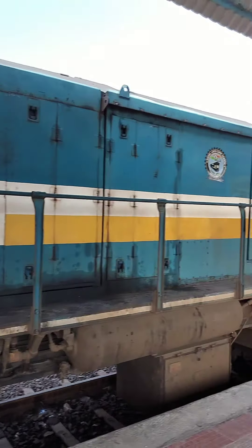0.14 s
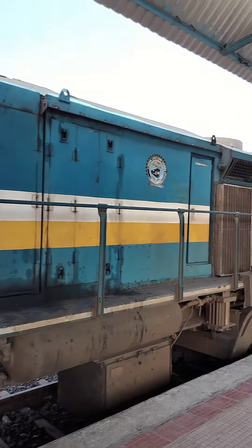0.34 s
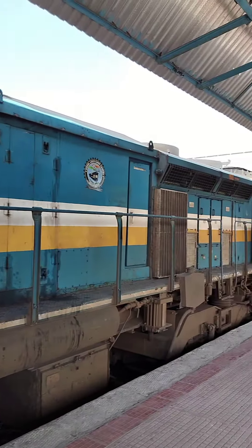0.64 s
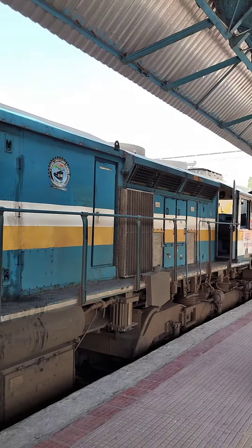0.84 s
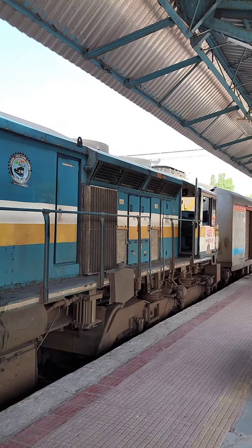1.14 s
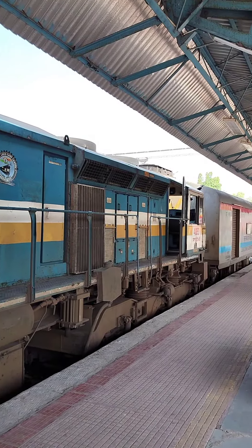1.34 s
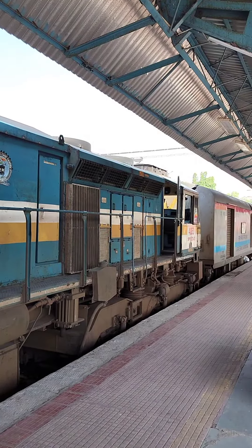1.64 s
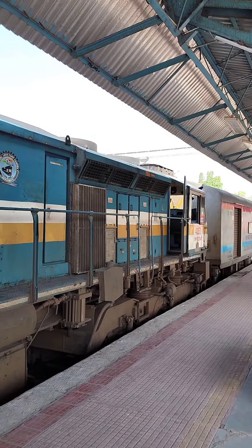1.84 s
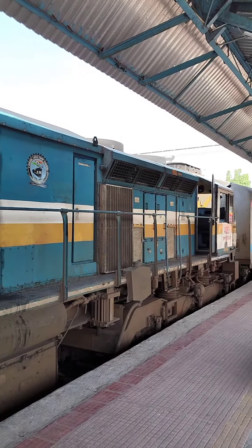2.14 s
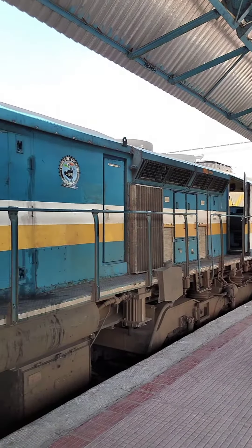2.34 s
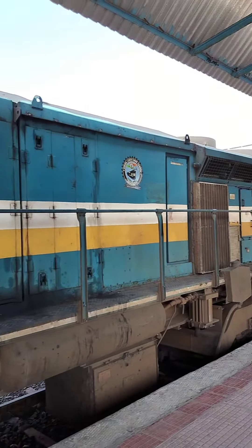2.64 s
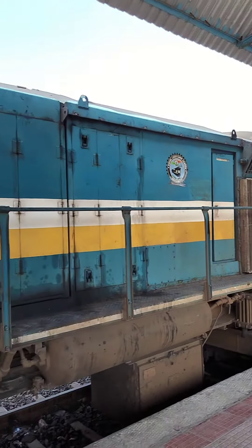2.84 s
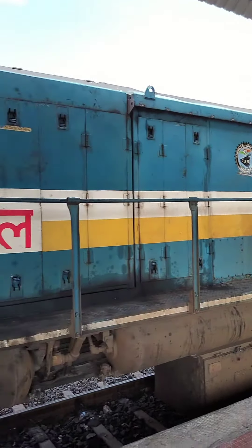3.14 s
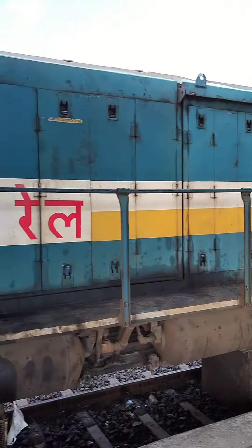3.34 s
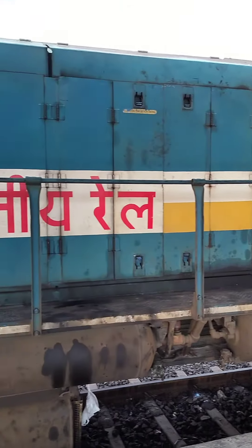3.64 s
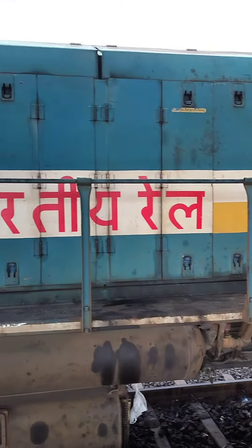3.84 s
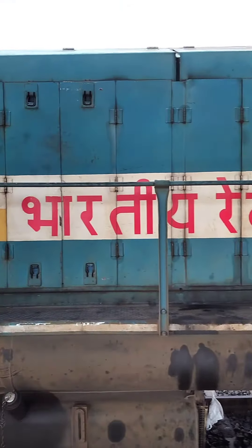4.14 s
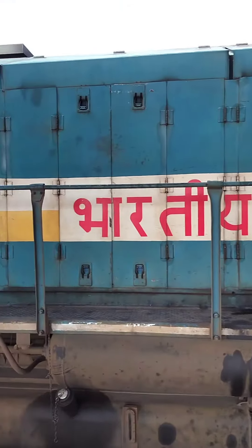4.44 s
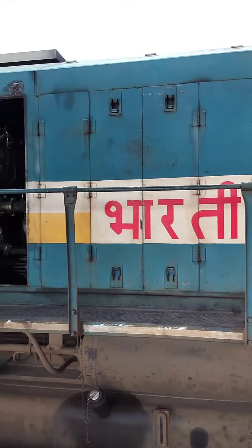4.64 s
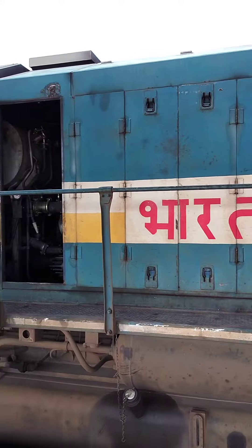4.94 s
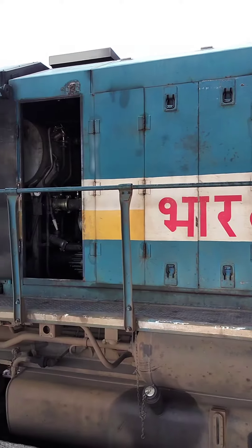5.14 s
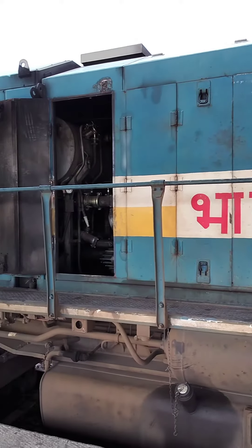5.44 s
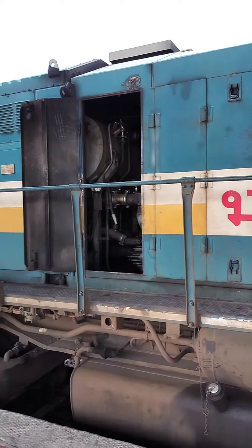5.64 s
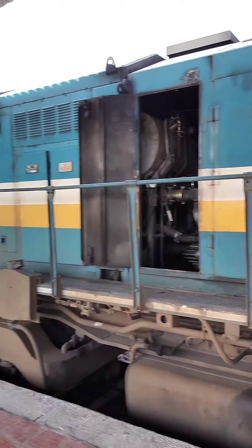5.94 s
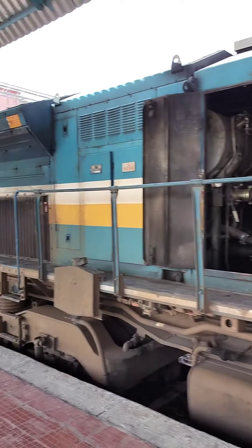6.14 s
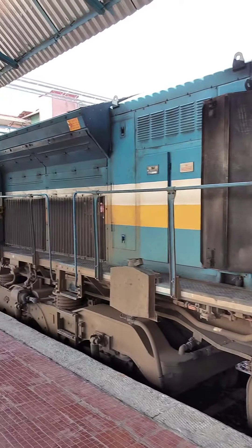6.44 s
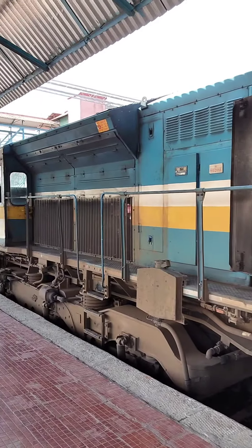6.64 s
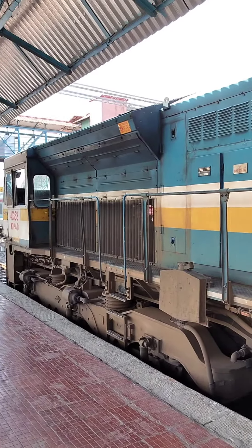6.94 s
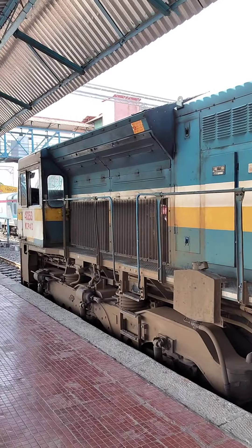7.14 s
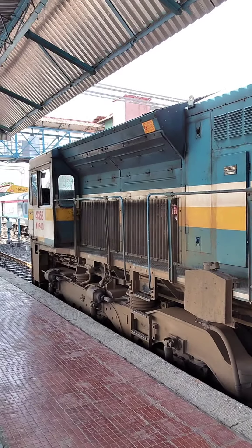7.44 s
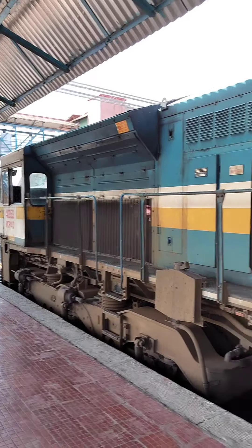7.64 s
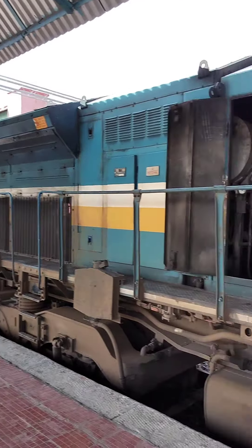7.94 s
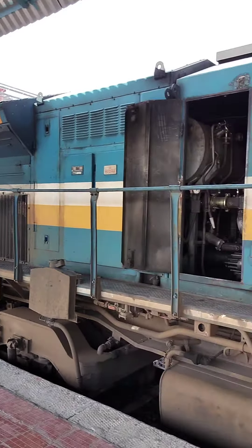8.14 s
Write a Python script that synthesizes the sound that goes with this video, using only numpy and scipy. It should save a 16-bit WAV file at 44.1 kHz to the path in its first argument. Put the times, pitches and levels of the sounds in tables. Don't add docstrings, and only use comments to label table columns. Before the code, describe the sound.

A big diesel locomotive stands at a roofed platform, its engine running at unchanging speed. A deep hum of about 76 hertz throbs with a slight hitch each shaft turn, under broad fan roar, rattling valves and panels, midrange gear whine and piercing turbocharger whistles. A handheld stereo phone, close by, pans right, then sweeps left; whines swell, fade and shift between ears, while clatter grows knockier near an open engine door.

```python
import sys
import numpy as np
from scipy import signal
from scipy.fft import rfft, irfft, next_fast_len
from scipy.io import wavfile
from scipy.ndimage import uniform_filter1d

SR = 44100
rng = np.random.default_rng(int(sys.argv[2]) if len(sys.argv) > 2 else 0)


def boost_factor(decibels):
    exponent = np.asarray(decibels, float) / 20
    return 10 ** exponent


def log_audio(samples):
    frames = np.atleast_2d(samples).T
    limited = np.clip(frames, -1, 1)
    pcm = np.round(limited * 32767).astype(np.int16)
    wavfile.write(sys.argv[1], SR, pcm)


N = 365148
T = np.arange(N) / SR
SHAFT_HZ, SHAFT_START_TURNS = 9.48979, -.0295
TURNS = SHAFT_HZ * T + SHAFT_START_TURNS

# (time [s], level [dB], left minus right [dB])
HUM_LEVEL = [(0.0, -17.5, -0.5), (1.71, -17, -1), (4.8, -16.5, -0.5), (6.59, -16, -1.5), (8.28, -15, -1)]
# (time [s], heading [deg], left positive)
PHONE_HEADING = [(0, -20.5), (.25, -32), (.5, -44), (1, -59.5), (1.5, -61), (2.25, -58.5), (3, -36.5),
                 (4, -0.5), (4.75, 15), (5.75, 32), (6.5, 64), (7.25, 66), (7.5, 67), (8.28, 50)]


def curves(table):
    times, *columns = np.transpose(table)
    return [np.interp(T, times, column) for column in columns]


def facing(table):
    degrees, *columns = np.transpose(table)
    heading, = curves(PHONE_HEADING)
    return [np.interp(heading, degrees, column) for column in columns]


def over(hz, table):
    points, values = np.transpose(table)
    return np.interp(np.log(hz + 1), np.log(points), values)


def unit(x):
    return x / np.sqrt(np.mean(x ** 2))


def placed(db, pan_db):
    return boost_factor(db + np.array([pan_db, -pan_db]) / 2)


def walk(rate):
    k = int(SR / rate)
    steps = np.repeat(rng.standard_normal(N // k + 1), k)
    return 1.24 * uniform_filter1d(uniform_filter1d(steps, k), k)[:N]


def swells(table, between_db):
    gain = boost_factor(between_db)
    for time, length, peak_db, *_ in table:
        phase = np.pi * np.clip((T - time) / length, -.5, .5)
        gain = gain + boost_factor(peak_db) * np.cos(phase) ** 2
    return 20 * np.log10(gain)


def colour(shared, left, right, spectrum):
    # (frequency [Hz], shared part of the power [0-1])
    likeness = [(60, 0.7), (130, 0.99), (290, 0.75), (640, 0.49), (1400, 0.12), (3000, 0.17), (15000, 0.1)]
    # (frequency [Hz], left minus right [dB])
    port_tilt = [(60, 4.5), (700, -2), (1300, 0.5), (2400, -1), (4400, 3.5), (5600, -2.5), (8100, 4.5),
                 (9300, -1.5), (15000, -5)]
    lag_samples = -22
    size = next_fast_len(N)
    hz = np.arange(size // 2 + 1) * SR / size
    like = np.clip(over(hz, likeness), 0, 1)
    late = np.exp(-2j * np.pi * hz * lag_samples / SR * np.clip(hz / 900 - .3, 0, 1))
    s, l, r = (rfft(noise, size) for noise in (shared, left, right))
    pair = np.sqrt(like) * np.array([s * late, s]) + np.sqrt(1 - like) * np.array([l, r])
    gains = placed(over(hz, spectrum), over(hz, port_tilt))
    return irfft(pair * gains, size)[:, :N]


def every_turn(memory, gate):
    turn = int(round(SR / SHAFT_HZ))
    fresh = rng.standard_normal((N // turn + 41, turn))
    repeated = signal.lfilter([1], [1, -min(memory, .99)], fresh, axis=0)
    return repeated[40:].ravel()[:N] * gate


def tone(cycles, left_db, right_db, lead=0, flutter_db=0.5, rate=6):
    start = 2 * np.pi * (cycles + rng.random())
    left = boost_factor(left_db + flutter_db * walk(rate)) * np.cos(start + lead / 2)
    right = boost_factor(right_db + flutter_db * walk(rate)) * np.cos(start - lead / 2)
    return np.sqrt(2) * np.array([left, right])


def fans():
    # (frequency [Hz], level per Hz [dB])
    roar = [(20, -14), (45, 4.5), (90, 10), (220, 3.5), (500, 2), (750, 4), (1500, 1.5), (2500, 2.5),
            (3300, -0.5), (4600, -2), (7500, -10.5), (9400, -38), (10000, -27), (15600, -25)]
    air = colour(*rng.standard_normal((3, N)), roar)
    level_db = -26 + 0.3229 * T + 0.64 * walk(2.55)
    return unit(air) * placed(level_db, np.full(N, -1.56))


def spit():
    # (time [s], peak [dB], decay [s])
    releases = [
        (4.66, -51, .05),
    ]
    band = signal.butter(2, [10500, 14500], "band", fs=SR, output="sos")
    out = 0
    for time, peak_db, decay in releases:
        since = np.maximum(T - time, 0)
        shape = (1 - np.exp(-since / .01)) * np.exp(-since / decay)
        hiss = signal.sosfilt(band, rng.standard_normal((2, N)))
        out = out + boost_factor(peak_db) * shape * unit(hiss)
    return out


def intake():
    # (time [s], length [s], peak [dB])
    surges = [(0, 0.14, -33), (.3, 0.22, -42), (.8, .25, -43), (1.3, .3, -31.5), (1.85, 0.18, -46),
              (2.3, 0.64, -40), (2.75, 0.23, -39), (3.3, 0.66, -44), (4.0, 0.33, -51), (4.62, .3, -50),
              (4.98, 0.29, -36), (5.2, .2, -45), (5.82, 0.4, -41), (6.52, 0.56, -37), (7.3, 0.42, -34),
              (7.85, 0.24, -54), (8.28, 0.33, -49)]
    level_db = swells(surges, -39)
    cycles = 8399 * T + np.cumsum(4.0 * walk(25)) / SR
    beat = 1 + 0.33 * np.cos(2 * np.pi * 8 * TURNS)
    whistle = beat * tone(cycles, level_db, level_db - 19.0, 3 * walk(2.06), flutter_db=2.5, rate=27)
    breath = signal.lfilter(*signal.iirpeak(8400, 38, SR), rng.standard_normal((2, N)))
    breath_db = -44.0 + 0.09 * (level_db + 43.5)
    return whistle + unit(breath) * placed(breath_db, np.full(N, 13.2))


def turbo():
    # (time [s], length [s], peak [dB])
    left_swells = [(.1, 0.6, -33.5), (.47, 0.48, -34), (1.5, 1.65, -32), (2.5, 0.44, -44),
                   (3.0, 0.68, -33.5), (3.68, .45, -32.5), (4.85, 1.2, -30.5), (5.4, 0.42, -37),
                   (5.9, 0.93, -35), (6.65, 0.95, -39), (7.35, 2.2, -32.5), (8.2, 0.27, -48)]
    # (time [s], length [s], peak [dB], left lead [rad])
    right_swells = [(0, .4, -32, 1), (.62, 0.86, -31, 3.3), (1.8, 0.8, -38, 0.95), (2.35, 0.46, -37, 1),
                    (2.75, 0.19, -39, 0), (3.204, 0.94, -29.5, -6), (3.6, 0.53, -43, -6.5),
                    (4.148, 0.48, -31, -8.5), (4.75, 0.39, -45, -12), (5.36, 0.63, -36, -11.5),
                    (5.922, 0.57, -34, -12), (6.365, 0.51, -34.5, -12), (7.1, 0.35, -57, -15),
                    (7.927, 0.43, -28.5, -11)]
    # (time [s], length [s], peak [dB])
    low_swells = [
        (.1, .6, -49),
        (.8, 0.85, -48.5),
        (1.85, 1, -48),
        (3.2, 1, -47),
        (5.9, .6, -53),
        (6.7, 0.79, -49),
        (7.2, .6, -56),
        (8.2, .4, -53),
    ]
    # (left [dB], right [dB])
    high_levels = (-56, -57)
    waver = np.cumsum(walk(5)) / SR
    heading, = curves(PHONE_HEADING)
    side_on_db = 0.31 * np.maximum(heading - 45, 0)
    high_l, high_r = (db + 2 * walk(2.35) for db in high_levels)
    low_db = swells(low_swells, -55)
    low_l = low_db - 0.5 + side_on_db
    low_r = low_db + 0.5 - side_on_db
    blades = [swells(side, -46.5) for side in (left_swells, right_swells)]
    lead = curves(right_swells)[-1]
    out = tone(4607.5 * T + 1.5 * waver, *blades, lead, flutter_db=1.6, rate=25)
    out += tone(5389 * T + 1.8 * waver, low_l, low_r, .9 * walk(1), flutter_db=2.2, rate=6)
    out += tone(9110 * T + 3 * waver, high_l + side_on_db, high_r, .9 * walk(1), flutter_db=2.2, rate=6)
    return out + intake()


def gears():
    # (heading [deg], left [dB], right [dB], left lead [rad])
    mesh_79 = [(-58.5, -29.5, -20.5, -1.4), (-67, -25.5, -19.5, 2.5), (-45.0, -23.5, -21, 1),
               (-34, -27.2, -23.1, -0.2), (-25.5, -30, -26.5, -0.5), (-15, -27, -20.5, -4),
               (4.5, -17.5, -32.5, -6), (14.5, -17.9, -37.8, -4.5), (23.5, -20, -32.0, -3.5),
               (32, -26.5, -25, -4), (41, -35, -25.5, -3), (51, -34, -24.5, -2), (70.0, -28, -28, -0.9)]
    mesh_113 = [(-61, -36, -29.5, 0.2), (-56.5, -32, -25, -1.7), (-43, -36, -26.5, -1.2),
                (-35.0, -41, -27, -3), (-29, -47.1, -31.5, -2), (-17, -44.4, -38.8, -4.5),
                (0.0, -30, -39.2, -5.1), (9, -34.5, -45, -7), (22, -44.7, -38, -2.8), (29, -44, -33, -1),
                (46, -31, -54, 0.7), (72, -38.6, -48, 5.5), (68, -46, -44, 4.5)]
    mesh_158 = [(-61.5, -47, -30.5, 4), (-46.5, -41, -35.5, 0.5), (-31, -33, -29.5, 1.3),
                (-24, -38, -33, 1.5), (-15, -37, -40, -5), (7, -49, -38, -8), (31, -38, -33, -8),
                (46, -42, -31.5, -8.8), (70, -36, -33, -8.5)]
    mesh_72 = [(-68, -36.5, -37, -5), (-51, -55, -37, -2.5), (-44, -53, -35, -6), (-37, -36.0, -31.4, -6.5),
               (-25.0, -37, -37.5, -5.6), (-14.0, -31.5, -36, -6.5), (-1, -31, -29, -5.7),
               (7, -33, -29.5, -6.5), (25.0, -38, -32.8, -5.7), (37, -35, -29, -5), (47, -41.7, -32, -8),
               (58.0, -41.5, -30, -8.5), (70.0, -39.0, -44, -6.8)]
    mesh_237 = [(-64, -37, -48, -0.64), (-50, -48, -39, -.7), (-5, -42, -45, -0.21), (-2, -47, -44, -1.6),
                (20, -39, -45, 1), (35, -47, -36, 0.38), (50, -46, -30.5, 1), (72, -41, -41, 0)]
    # (multiple of shaft rate, left [dB], right [dB])
    lesser = [(41, -52, -43), (46, -47, -50), (48, -46, -50), (1243.6, -73, -73), (34, -43, -45),
              (1135.6, -70, -70), (1445.4, -70, -70), (226, -52, -46), (474.3, -50, -49), (564.8, -60, -59),
              (110.4, -48, -44), (30.4, -50, -43), (18.3, -43, -46), (477.5, -55, -58), (496.5, -58, -58)]
    out = tone(79 * TURNS, *facing(mesh_79)) + tone(113 * TURNS, *facing(mesh_113))
    depth = 0.36 + 0.49 * np.exp(-(T / 0.57) ** 2)
    throb = 1 + depth * np.cos(2 * np.pi * (TURNS - .07))
    out += throb * tone(158 * TURNS, *facing(mesh_158), flutter_db=1.5)
    out += tone(72 * TURNS, *facing(mesh_72), flutter_db=2.5, rate=12)
    out += tone(237 * TURNS, *facing(mesh_237), flutter_db=1.5)
    for k, left_db, right_db in lesser:
        out += tone(k * TURNS, left_db, right_db, 2.23 * walk(.6), flutter_db=3.5, rate=1.51)
    return out


def knock():
    # (heading [deg], level [dB], left minus right [dB])
    knock_levels = [
        (-64, -42, 5),
        (-20, -44, -1),
        (25, -34, -2),
        (45, -32, 0),
        (70, -31, -3),
    ]
    modes = [(672.5, 21, 0.), (729, 21, -3), (438.5, 25, -7.5)]  # (frequency [Hz], width [Hz], level [dB])
    blows = np.diff(np.floor(TURNS - .78), prepend=-1) * boost_factor(1.4 * walk(6))
    build = np.arange(400)
    pulse = np.hanning(400) * (.25 + np.cos(2 * np.pi * 690 * build / SR))
    push = np.convolve(blows, pulse)[:N]
    ring = 0
    for hz, width, db in modes:
        ring = ring + boost_factor(db) * signal.lfilter(*signal.iirpeak(hz, hz / width, SR), push)
    return unit(ring) * placed(*facing(knock_levels))


def works():
    # (heading [deg], body [dB], left minus right [dB], panels [dB], left minus right [dB])
    clatter = [
        (-60, -26.5, 0.5, -26.5, -4.5),
        (-39, -26, -1.5, -28, -2.5),
        (1, -26, 3, -28.5, -3.5),
        (25, -27, 2, -29.5, 3),
        (69, -26.5, 2, -28, -1.5),
    ]
    # (frequency [Hz], level per Hz [dB])
    body_spectrum = [(200, -29), (280, -15.5), (400, -0.5), (510, -12), (690, 1.5), (745, 1), (790, -8),
                     (1000, -14), (1200, -43)]
    panel_spectrum = [(750, -28), (900, -1), (1240, 5), (1500, 2), (1650, -2.5), (1900, 3.5), (2250, -2),
                      (2700, -9.5), (3500, -32)]
    body_db, body_pan, panel_db, panel_pan = facing(clatter)
    firing = np.exp(-((8 * TURNS) % 1) / 0.89)
    hardest = np.exp(-((TURNS - .84) % 1) / 0.12)
    body_gate = 0.97 + firing + 0.62 * hardest
    panel_gate = 8.4 + firing + 0.29 * hardest
    body = colour(*(every_turn(0.91, body_gate) for _ in range(3)), body_spectrum)
    panels = colour(*(every_turn(0.81, panel_gate) for _ in range(3)), panel_spectrum)
    return unit(body) * placed(body_db, body_pan) + unit(panels) * placed(panel_db - 0.5, panel_pan)


def rumble():
    # (frequency [Hz], level per Hz [dB])
    burning = [(80, -25), (115, -2), (140, 0), (230, -4), (270, -12), (330, -35)]
    hum_db, pan_db = curves(HUM_LEVEL)
    shared, left, right = rng.standard_normal((3, N))
    low = colour(shared, .5 * left, .5 * right, burning)
    return unit(low) * placed(-37 + hum_db - hum_db.mean(), pan_db)


def exhaust_start(k, chance):
    if k < 8:
        return .32
    if k < 15:
        return (k > 8) * (.37 + .02 * k + .23 * max(k - 11, 0))
    if k < 20:
        return .33 + k / 2
    return .9 - .17 * (k - 20) if k < 25 else chance


def exhaust():
    # (multiple of shaft rate, level against the firing tone [dB])
    harmonics = [(1, -45), (2, -44), (3, -35), (4, -35), (5, -37), (6, -26), (7, -25.5), (8, -0.5),
                 (9, -6.5), (10, -13), (11, -17.5), (12, -23), (13, -19.5), (14, -20.5), (15, -16),
                 (16, -22), (17, -20.5), (18, -25), (19, -27.5), (20, -25), (21, -22.5), (22, -29.5),
                 (23, -19.5), (24, -21), (25, -21.5), (26, -25), (27, -34.5)]
    out = 0
    for k, db in harmonics:
        start = exhaust_start(k, rng.random())
        from_firing = abs(k - 8)
        drift = 0.0028 * from_firing * walk(0.81)
        apart = 0.00097 * k * walk(0.33)
        slow_db = 0.13 * from_firing * walk(1.2)
        quick_db = min(0.49 * from_firing + 0.19, 2.2) * walk(9)
        swell = boost_factor(db - 0.96 * (k > 11) + slow_db + quick_db)
        cycles = k * TURNS + start + drift + np.array([apart, -apart])
        out = out + swell * np.cos(2 * np.pi * cycles)
    return np.sqrt(2) * out * boost_factor(-1.0) * placed(*curves(HUM_LEVEL))


def scene():
    return fans() + spit() + turbo() + gears() + knock() + works() + rumble() + exhaust()


def roll_off(x):
    return signal.sosfilt(signal.butter(12, 15640, fs=SR, output="sos"), x)


def record(dry):
    dip = dry - .5 * signal.lfilter(*signal.iirpeak(9800, 13, SR), dry)
    rounded = np.tanh(.6 * dip) / .6
    return roll_off(rounded)


dry = scene()
out = record(dry)
log_audio(out)
```